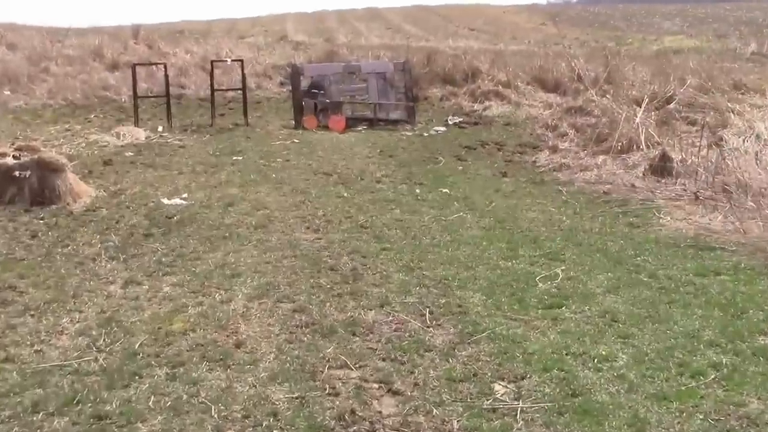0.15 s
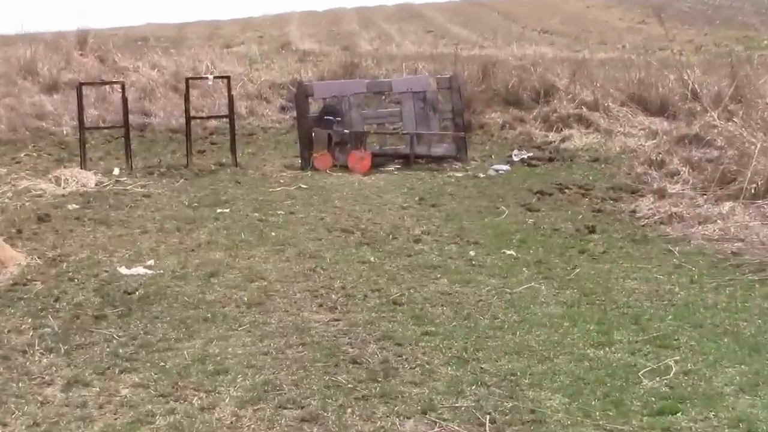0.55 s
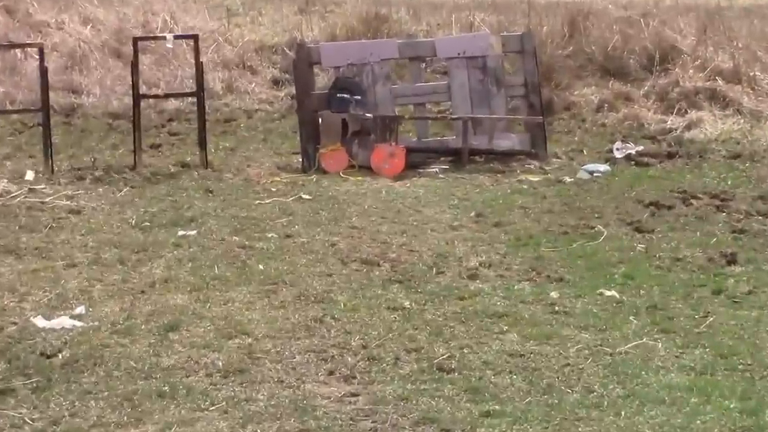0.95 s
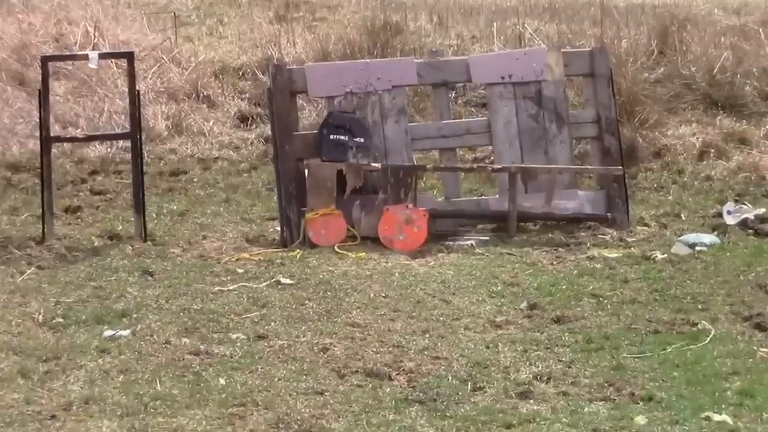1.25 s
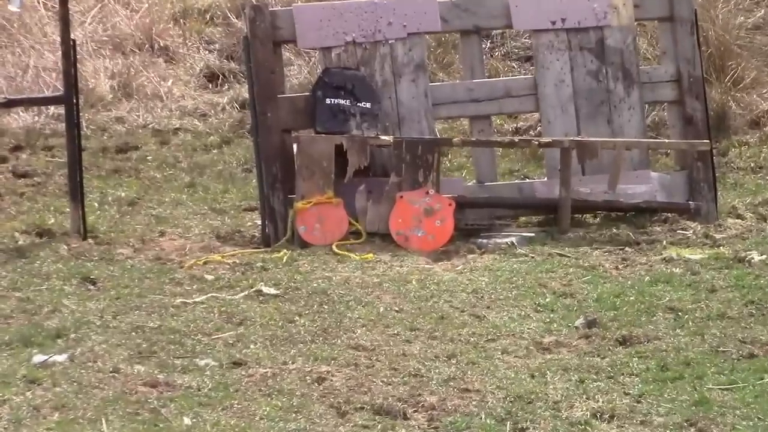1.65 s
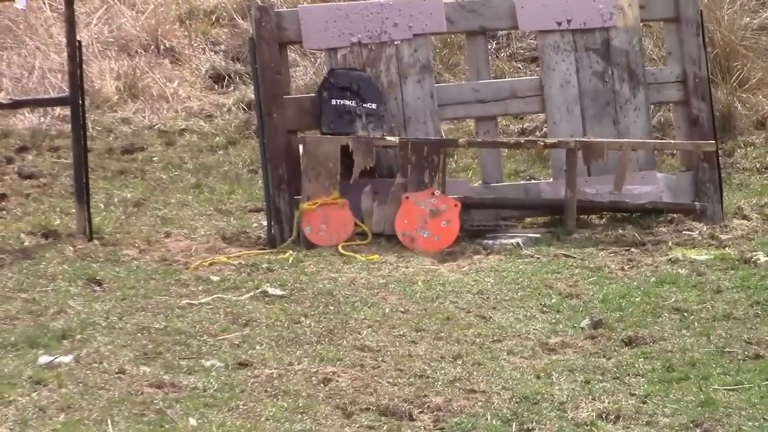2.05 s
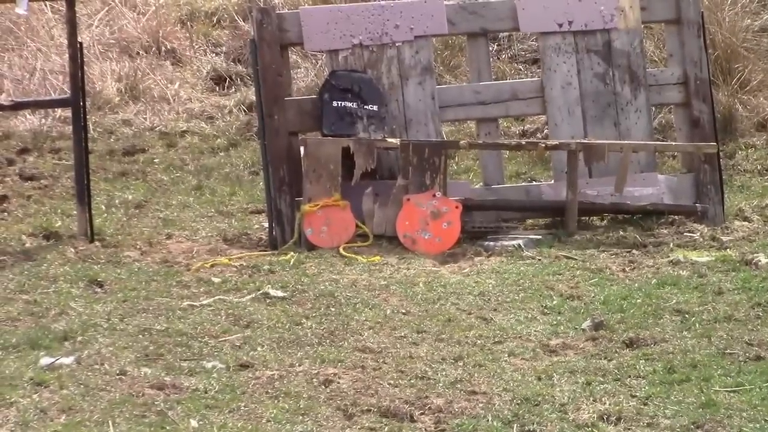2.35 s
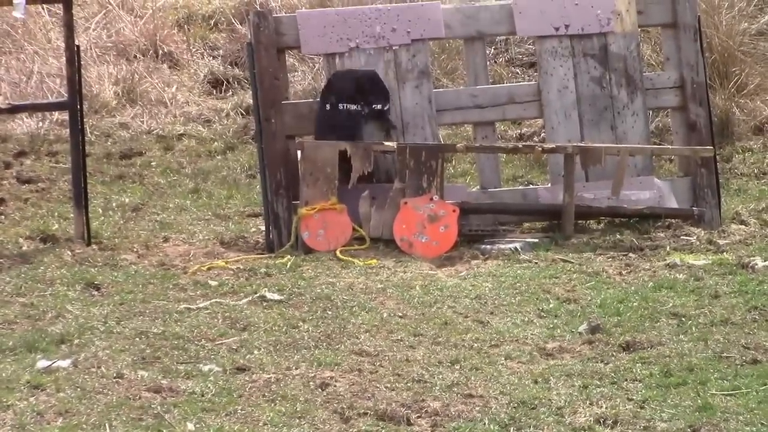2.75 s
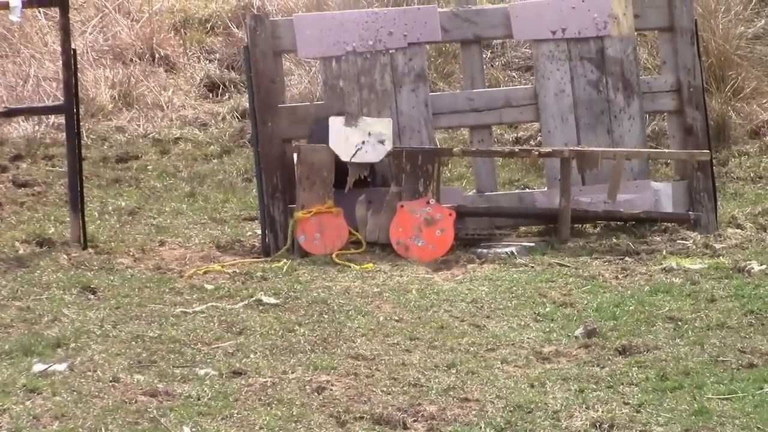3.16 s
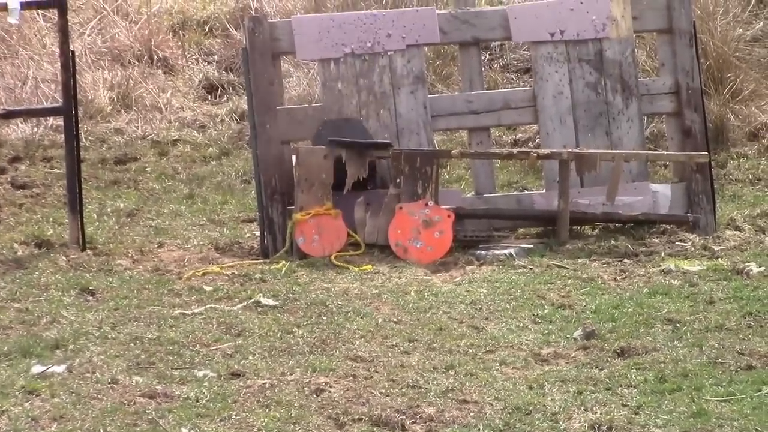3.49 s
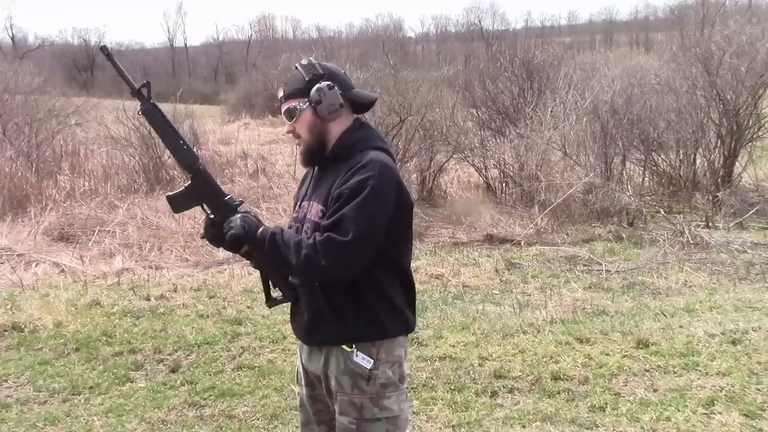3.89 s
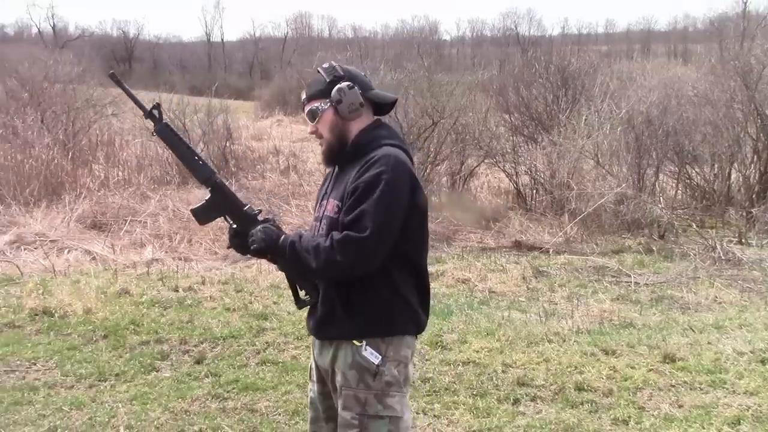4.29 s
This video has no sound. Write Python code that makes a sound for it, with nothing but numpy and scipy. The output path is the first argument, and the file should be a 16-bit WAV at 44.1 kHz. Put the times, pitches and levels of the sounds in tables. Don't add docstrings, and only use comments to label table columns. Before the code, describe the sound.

Quiet field hum and faint camera zoom whir, then a sharp gunshot with metallic clang, rolling tree-line echo, and close rifle handling.

```python
import sys
import numpy as np
from scipy import signal
from scipy.fft import rfft, irfft, next_fast_len
from scipy.io import wavfile
from scipy.ndimage import uniform_filter1d

SR = 44100
rng = np.random.default_rng(int(sys.argv[2]) if len(sys.argv) > 2 else 0)


def voltage_ratio(decibels):
    exponent = np.asarray(decibels, float) / 20
    return 10 ** exponent


def digitize_waveform(pressure):
    field = np.atleast_2d(pressure).T
    bounded = np.clip(field, -1, 1)
    quanta = np.round(bounded * 32767).astype(np.int16)
    wavfile.write(sys.argv[1], SR, quanta)


N = 195318

STRIKE_S = 2.69
SCENE_CHANGE_S = 3.826


def evened(x):
    return x / np.sqrt(np.mean(x ** 2) + 1e-20)


def wandering(shape, *sizes):
    drift = rng.standard_normal(shape)
    for size in sizes:
        drift = uniform_filter1d(drift, size=size)
    return evened(drift)


def read(points, hz):
    f, value = np.transpose(points)
    return np.interp(np.log(hz + 1), np.log(f + 1), value)


def follow(rows, t):
    s, *columns = np.transpose(rows)
    return [np.interp(t, s, column) for column in columns]


def placed(sounds):
    mix = np.zeros((2, N))
    for s, sound in sounds:
        part = mix[:, round(s * SR):][:, :sound.shape[-1]]
        part += sound[..., :part.shape[-1]]
    return mix


def resonate(x, hz, width):
    turn = np.exp(2j * np.pi * hz * np.arange(x.shape[-1]) / SR)
    r = np.exp(-np.pi * abs(width) / SR)
    smooth = signal.lfilter([(1 - r) ** 2], [1, -2 * r, r * r], x / turn)
    return 2 * (turn * smooth).real


def noise(field_db, t0, t1, size, patchy_db):
    hop, length = size // 4, round((t1 - t0) * SR)
    hz = np.fft.rfftfreq(size, 1 / SR)[:, None]
    t = t0 + np.arange(length // hop + 5) * hop / SR
    a, b = rng.standard_normal((2, 2, len(hz), len(t)))
    patches = rng.standard_normal((len(hz), len(t)))
    patches = uniform_filter1d(patches, size=5, axis=0)
    patches = evened(uniform_filter1d(patches, size=8, axis=1))
    z = (a + 1j * b) * voltage_ratio(field_db(hz, t) + patchy_db * patches)
    return signal.istft(z, nperseg=size, noverlap=size - hop)[1][:, :length] / np.sqrt(size) * 2


def burst(db, hz, width, rise, t60):
    t = np.arange(12000) / SR
    bell = np.exp(-((np.fft.rfftfreq(len(t), 1 / SR) - hz) / width) ** 2)
    shape = np.where(t < rise, (t / rise) ** 2, voltage_ratio(-60 * (t - rise) / t60))
    puff = shape * irfft(rfft(rng.standard_normal((2, len(t)))) * bell, len(t))
    return voltage_ratio(db) * puff / abs(puff).max(axis=1, keepdims=True)


def bursts(rows, width_share, rise_cycles):
    return placed([(s, burst(db, hz, width_share * hz, rise_cycles / hz, t60)) for s, db, hz, t60 in rows])


def thump(db, hz):
    t = np.arange(1500) / SR
    swell = np.e * hz * t / 0.56 * np.exp(-hz * t / 0.46)
    return voltage_ratio(db) * np.sin(2 * np.pi * hz * t) * swell


# start in seconds, peak level in dB, centre in Hz, time to fade by 60 dB in seconds.
SNAP_EVENTS = [(2.6192, -14, 3000, .022), (2.6262, -11, 6000, .02), (2.6277, 7, 4800, .026),
               (2.6279, -1, 11500, .025), (2.688, -11, 10500, .07), (2.961, -23, 2100, .025),
               (2.685, -8.5, 1800, .02), (2.6905, .5, 4300, .05), (2.72, -13, 8000, .023),
               (2.8125, -8, 5200, .045), (2.829, -8, 5200, .06), (2.9042, -9, 4300, .042),
               (2.9438, -26, 3600, .025), (3.09, -37, 2500, .04), (3.179, -19, 2080, .02),
               (3.197, -15, 2600, .025), (3.217, -11.5, 1200, .048), (3.2488, -10, 2500, .012)]


def shot_snaps():
    return bursts(SNAP_EVENTS, width_share=.85, rise_cycles=2.5)


# start in seconds, peak level in dB, centre in Hz, time to fade by 60 dB in seconds.
BOOM_EVENTS = [(2.63, -3, 2100, .035), (2.63, -12, 700, .06), (2.652, -11, 520, .1), (2.672, -13, 600, .06),
               (3.12, -21.5, 650, .037), (3.19, -14, 690, .06), (3.219, -10, 760, .07),
               (3.285, -9, 660, .1), (2.9045, -27, 13500, .04), (2.97, -38, 9000, .03),
               (3.036, -40, 12000, .045), (3.094, -49, 9000, .04), (2.8, -20, 240, .25),
               (3.385, -56, 11140, .017), (3.426, -49, 7500, .014)]


def hollow_booms():
    return bursts(BOOM_EVENTS, width_share=.27, rise_cycles=5)


# pitch in Hz, loudest moment in seconds, level
# in dB, time to fade by 60 dB in seconds.
PLATE_MODES = [(782, 2.87, -26, .3), (896, 2.83, -19.5, .75), (1150, 2.815, -21, .43),
               (1215, 2.735, -21, .7), (1362, 2.83, -32, .6), (1414, 2.801, -24.5, 1.2),
               (1512, 2.86, -28, .3), (1645, 2.797, -21, .45), (1793, 2.736, -21.5, .3),
               (1825, 2.74, -25, .3), (2150, 2.766, -28, .55), (2219, 2.78, -28, .5),
               (2466, 2.72, -33, .54),
               (2721, 2.785, -25, .25), (2840, 2.76, -24.5, .35), (2977, 2.78, -30, .37),
                (3141, 2.765, -23.5, .3), (3488, 2.7, -24.5, .2), (3630, 2.83, -27, .15),
                (3780, 2.696, -18, .1), (3950, 2.703, -23, .25), (4231, 2.835, -28, .15),
                (4340, 2.75, -32, .3), (4480, 2.813, -26, .15)]


def plate():
    t = STRIKE_S + np.arange(SR // 2) / SR
    ring = 0
    for hz, top_s, db, t60 in PLATE_MODES:
        split, a, b = rng.random(3)
        rise = np.clip(.7 * (top_s - STRIKE_S), .004, 85 / hz)
        swell = np.sin(np.pi / 2 * np.clip(1 + (t - top_s) / rise, 0, 1)) ** 2
        fade_db = -60 * np.maximum(t - top_s, 0) / t60
        choke_db = -90 * np.maximum(t - 3.01, 0)
        waver_db = (1.1 + hz / 6000) * wandering(len(t), 500)
        twin_hz = hz * (1.006 + .01 * split)
        pair = np.sin(2 * np.pi * (hz * t + a)) + hz / 7000 * np.sin(2 * np.pi * (twin_hz * t + b))
        ring = ring + voltage_ratio(db + 5.5 + fade_db + choke_db + waver_db) * swell * pair
    return placed([(STRIKE_S, ring)])


def echo(rows, colour, treble_db, air_db_per_s, deepest_s, bass_db, linger, reach, flicker_db):
    start_s, end_s = rows[0][0], rows[-1][0]

    def field_db(hz, t):
        level_db, = follow(rows, t)
        high = np.clip((hz - 2600) / 3600, 0, reach)
        low = np.clip(np.log2(900 / (hz + 1)), 0, 1)
        high_db = treble_db + air_db_per_s * np.minimum(t - start_s, deepest_s)
        low_db = bass_db - linger * (level_db + 28)
        return read(colour, hz) + level_db + high_db * high + low_db * low
    scatter = noise(field_db, start_s, end_s, size=256, patchy_db=1.5)
    flicker = wandering(scatter.shape[1], 100, 60)
    return placed([(start_s, voltage_ratio(19.5 + flicker_db * flicker) * scatter)])


# time in seconds, level in dB.
GROUND_LEVEL = [
    (2.629, -21),
    (2.663, -24),
    (2.69, -22),
    (2.84, -24),
    (2.911, -27.5),
    (2.935, -35),
    (2.97, -39),
    (3.085, -58),
]
# frequency in Hz, level in dB.
GROUND_COLOUR = [(60, -56.5), (150, -26.5), (260, -9), (450, -8), (700, -14), (1200, -9.5), (2200, -7.5),
                 (4200, -11), (8000, -14.5), (11000, -21), (15000, -36)]


def ground_echo():
    return echo(GROUND_LEVEL, GROUND_COLOUR, treble_db=4, air_db_per_s=-95, deepest_s=.21,
                bass_db=-.5, linger=.6, reach=1.5, flicker_db=1.6)


# time in seconds, level in dB.
TREE_LEVEL = [
    (3.085, -52.5),
    (3.101, -44.5),
    (3.173, -33.5),
    (3.195, -28),
    (3.251, -29),
    (3.27, -32.5),
    (3.34, -34),
    (3.539, -44),
    (3.826, -50.5),
]
# frequency in Hz, level in dB.
TREE_COLOUR = [(60, -52), (160, -20.5), (380, -15), (520, -8), (700, 2), (1150, -4), (1700, -5.5),
               (2400, -9), (3300, -7.5), (4500, -11.5), (9000, -18.5), (15000, -48)]


def tree_echo():
    return echo(TREE_LEVEL, TREE_COLOUR, treble_db=-13.5, air_db_per_s=-35, deepest_s=.6,
                bass_db=2.5, linger=-.08, reach=3.5, flicker_db=1.7)


# time in seconds, level in dB.
SCRAPE_LEVEL = [
    (4.34, -52),
    (4.35, -38),
    (4.36, -38),
    (4.385, -31),
    (4.4, -34),
    (4.41, -40),
    (4.428, -43),
]
# centre in Hz, width in Hz, level in dB.
RECEIVER = [(1410, 200, -6), (2800, 1800, 1), (6630, 354, -3.5), (6000, 5800, 6)]


def bolt_slide():
    start_s = SCRAPE_LEVEL[0][0]
    t = np.arange(start_s, N / SR, 1 / SR)
    grit = rng.standard_normal((2, len(t))) * voltage_ratio(3 * wandering(len(t), 40))
    body = sum(voltage_ratio(db) * evened(resonate(grit, hz, width)) for hz, width, db in RECEIVER)
    level_db, = follow(SCRAPE_LEVEL, t)
    return placed([(start_s, voltage_ratio(level_db - 0.5) * evened(body))])


# start in seconds,
# peak level in dB, centre in Hz, time to fade by 60 dB in seconds.
TICK_EVENTS = [(1.437, -40.5, 4500, .035), (1.655, -48, 2600, .02), (1.795, -53, 6000, .028),
               (3.8258, -42.5, 9000, .01), (3.9474, -28, 5500, .022), (3.986, -43, 6000, .01),
               (4.016, -25, 5500, .028), (4.2915, -28, 700, .025), (4.308, -44, 2500, .088),
               (4.3266, -41, 7500, .018), (4.341, -25, 2400, .07), (4.3415, -32, 7000, .03),
               (4.378, -25, 2800, .03), (4.395, -21, 2300, .039), (4.398, -29, 5500, .018)]


def part_ticks():
    return bursts(TICK_EVENTS, width_share=.95, rise_cycles=4)


# start in seconds, peak level in dB, centre in Hz, time to fade by 60 dB in seconds.
TAP_EVENTS = [(.125, -44.5, 2170, .02), (.424, -47.5, 3780, .022), (.821, -46.5, 1800, .022),
              (1.169, -46, 1800, .02), (1.43, -41, 1500, .025), (1.435, -40.5, 2800, .035),
              (1.436, -42, 4470, .02), (3.949, -32, 1800, .04), (4.3552, -22, 7500, .013),
              (4.3937, -12, 6900, .018), (4.394, -20.5, 10900, .013)]


def hollow_taps():
    return bursts(TAP_EVENTS, width_share=.36, rise_cycles=4)


# start in seconds, peak
# level in dB, pitch in Hz.
THUMP_EVENTS = [(2.721, -11, 400), (3.849, -41, 258), (3.926, -33, 140), (3.946, -29, 273),
                (3.955, -27.5, 325), (3.971, -29, 247), (3.981, -33, 196), (4.056, -39.5, 261),
                (4.179, -44.5, 206), (4.27, -35.5, 415), (4.281, -34, 322), (4.291, -23.5, 293),
                (4.314, -29, 209), (4.318, -24.5, 350), (4.338, -26, 207), (4.41, -33, 261),
                (4.419, -34, 273)]


def dull_thumps():
    return placed([(s, thump(db, hz)) for s, db, hz in THUMP_EVENTS])


# start in seconds, peak level in dB, pitch in Hz.
KNOCK_EVENTS = [
    (0.018, -50, 183),
    (1.248, -59, 88.8),
    (1.305, -54, 159),
    (1.329, -50, 105),
    (1.424, -42.5, 173),
    (1.526, -46, 231),
    (1.559, -44, 245),
    (1.708, -46, 198),
    (1.824, -53, 275),
]


def finger_knocks():
    return placed([(s, thump(db, hz)) for s, db, hz in KNOCK_EVENTS])


# time in seconds, whir level in dB, whine level in dB.
MOTOR_LEVEL = [
    (0, -72, -81.5),
    (.08, -61.5, -75),
    (.3, -59.5, -75),
    (.48, -64, -78),
    (.56, -76, -77),
    (1.3, -77, -79),
    (1.4, -87, -95),
]


def motor():
    whir_db, whine_db = follow(MOTOR_LEVEL, np.arange(N) / SR)
    hiss = rng.standard_normal((2, N))
    whir = evened(resonate(hiss, hz=1590, width=160))
    whine = evened(resonate(hiss, hz=5750, width=200))
    return voltage_ratio(whir_db) * whir + voltage_ratio(whine_db) * whine


# strongest moment in seconds, level in dB, length in seconds.
GUST_EVENTS = [(0.02, -62, .2), (.33, -66, .2), (.82, -73, .2), (1.06, -71, .25), (1.33, -58, .1),
               (1.43, -56, .05), (1.55, -57, .14), (1.85, -61, .5), (2.29, -57, .07), (2.6, -60, .3),
               (3.2, -62, .8), (3.7, -54, .25), (3.965, -41, .14), (4.065, -49, .07), (4.18, -52.5, .08),
               (4.29, -43, .08), (4.39, -38, .2)]
# frequency in Hz, level in dB.
GUST_COLOUR = [(30, -41.5), (70, -26.5), (140, -1.5), (260, 1.5), (450, -7), (800, -27.5), (1500, -61)]


def wind():
    t = np.arange(N) / SR
    level = voltage_ratio(-80)
    for s, db, length in GUST_EVENTS:
        level = level + voltage_ratio(db - 14 * (2 * (t - s) / length) ** 2)
    return level * evened(noise(lambda hz, t: read(GUST_COLOUR, hz), 0, N / SR, size=1024, patchy_db=3.0))


# frequency in Hz, level in dB per Hz.
HUM_BEFORE = [(15, -57.5), (25, -38.5), (193, -11), (379, -13), (433, -7.5), (523, -2.5), (666, -2.5),
              (722, -7.5), (826, -5), (971, -10), (1140, -11.5), (2490, -21.5), (15500, -36.5)]
# frequency in Hz, level in dB per Hz.
HUM_AFTER = [(15, -70.5), (25, -39), (113, -8.5), (297, -7.5), (445, -22), (537, -1), (598, -5),
             (783, -5.5), (1110, -11), (15500, -37)]


def field():
    before = noise(lambda hz, t: read(HUM_BEFORE, hz), 0, SCENE_CHANGE_S, size=1024, patchy_db=1.5)
    after = noise(lambda hz, t: read(HUM_AFTER, hz), SCENE_CHANGE_S, N / SR, size=1024, patchy_db=2.0)
    return placed([(0, evened(before) * voltage_ratio(-53)), (SCENE_CHANGE_S, evened(after) * voltage_ratio(-50.5))])


# frequency in Hz, side minus mid level in dB.
SIDE_LEVEL = [(40, -9), (80, -16), (120, -36), (700, -38), (1400, -30), (2800, -20), (5600, -11),
              (10000, -11), (15000, -15)]


def left_and_right(mix):
    mid, side = mix
    size = next_fast_len(N)
    side = irfft(rfft(side, size) * voltage_ratio(read(SIDE_LEVEL, np.fft.rfftfreq(size, 1 / SR))))[:N]
    since = np.arange(N) / SR - GROUND_LEVEL[0][0] + .003
    side = side * (1 + 2.2 * np.exp(-abs(since) / .005) * (since > 0))
    return np.array([mid + side, mid - side])


def scene():
    events = shot_snaps() + hollow_booms() + plate() + ground_echo() + tree_echo()
    events += bolt_slide() + part_ticks() + hollow_taps() + dull_thumps() + motor()
    low_cut = signal.butter(3, 175, "high", fs=SR, output="sos")
    return left_and_right(signal.sosfilt(low_cut, events) + finger_knocks() + wind() + field())


# frequency in Hz, level in dB.
MIC_RESPONSE = [(7000, 0), (10000, -2), (13000, -6.5), (15500, -4)]


def microphone(dry):
    hz = np.linspace(0, SR / 2, 65)
    response = signal.firwin2(129, hz, voltage_ratio(read(MIC_RESPONSE, hz)), fs=SR)
    return signal.oaconvolve(dry, response[None], "same")


def band_limit(x):
    return signal.sosfilt(signal.butter(12, 15670, fs=SR, output="sos"), x)


def record(dry):
    heard = microphone(dry)
    limit = 1.02
    held = heard / (1 + (heard / limit) ** 6) ** (1 / 6)
    return band_limit(held)


dry = scene()
out = record(dry)
digitize_waveform(out)
```